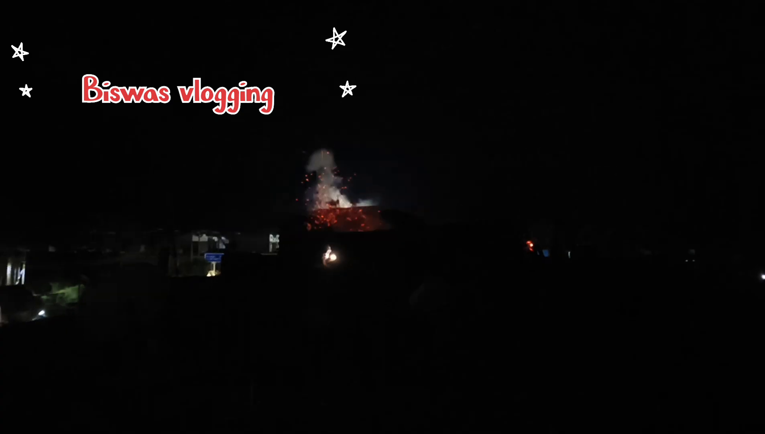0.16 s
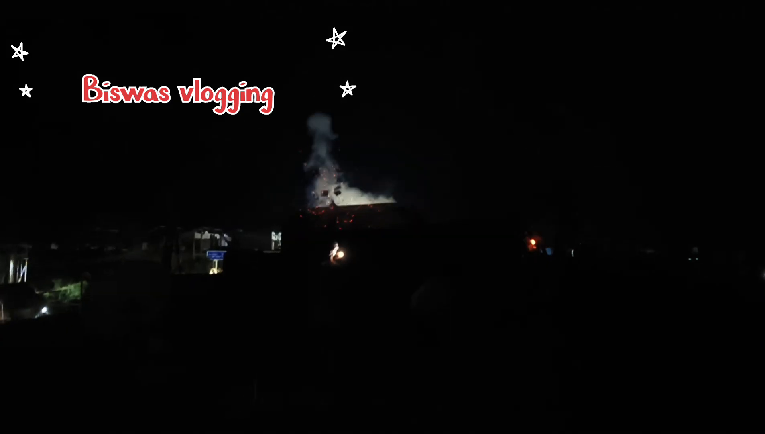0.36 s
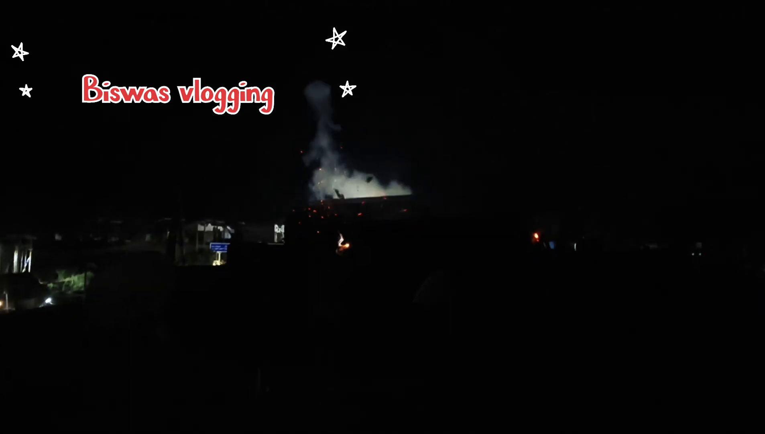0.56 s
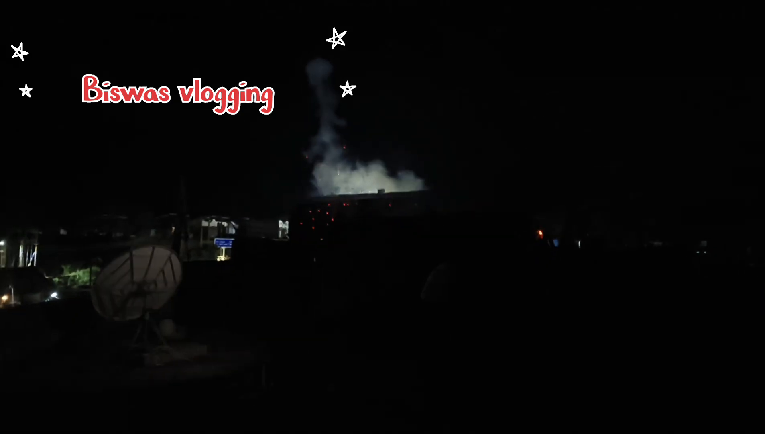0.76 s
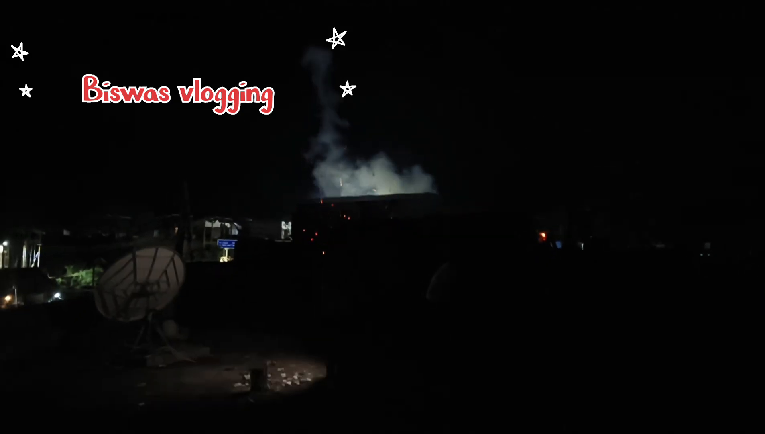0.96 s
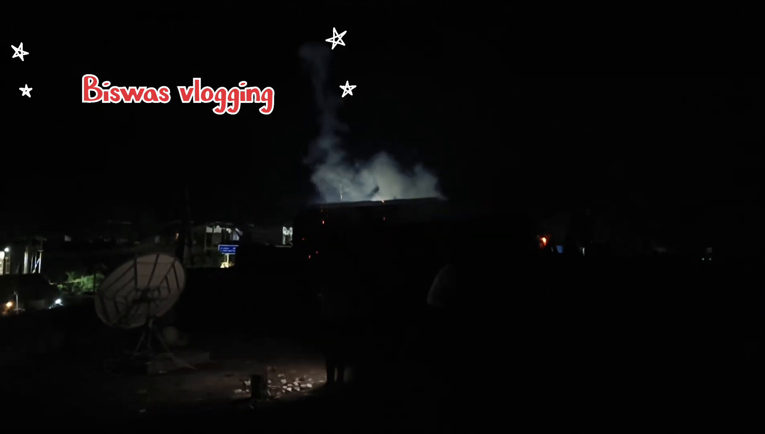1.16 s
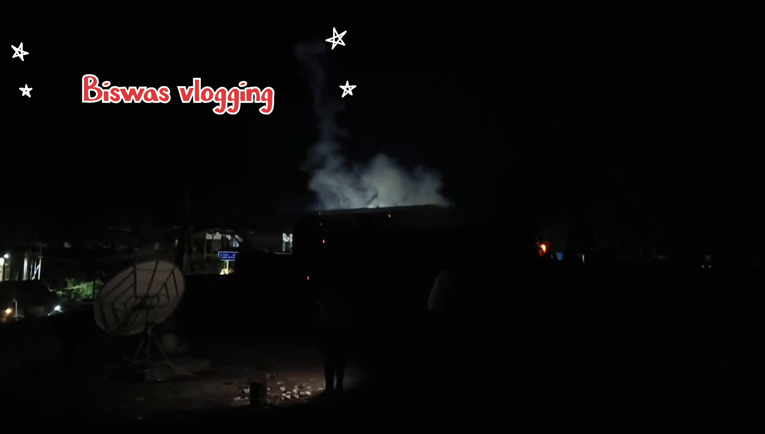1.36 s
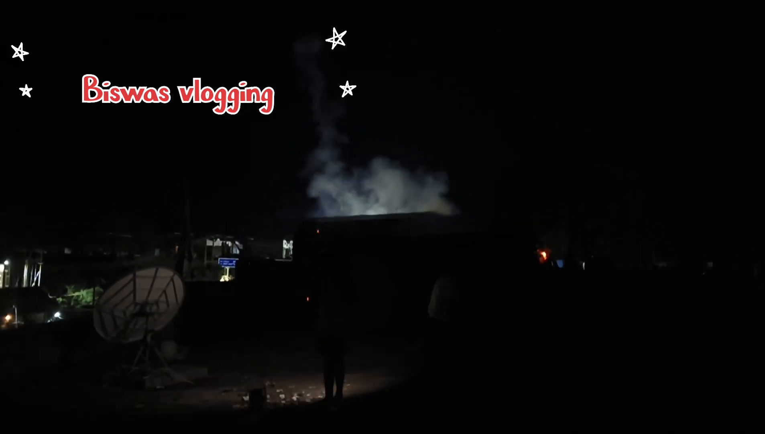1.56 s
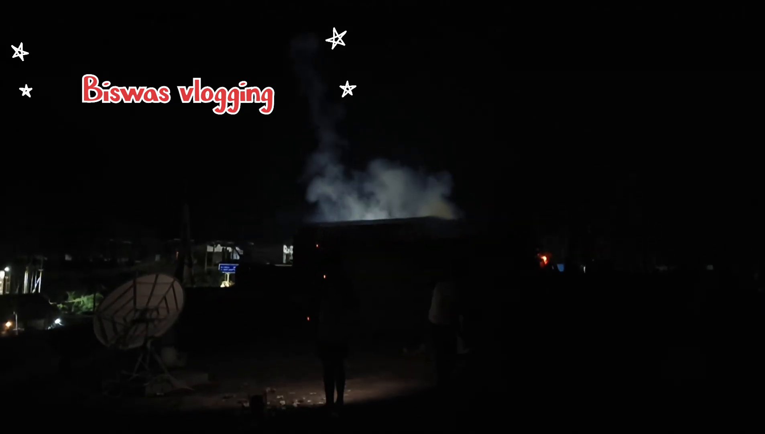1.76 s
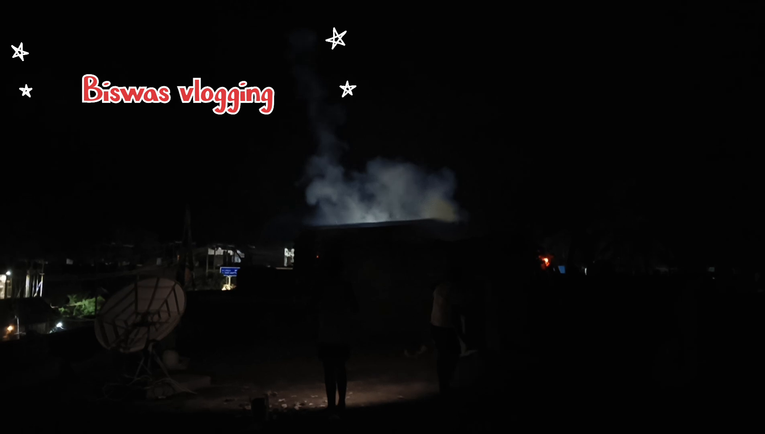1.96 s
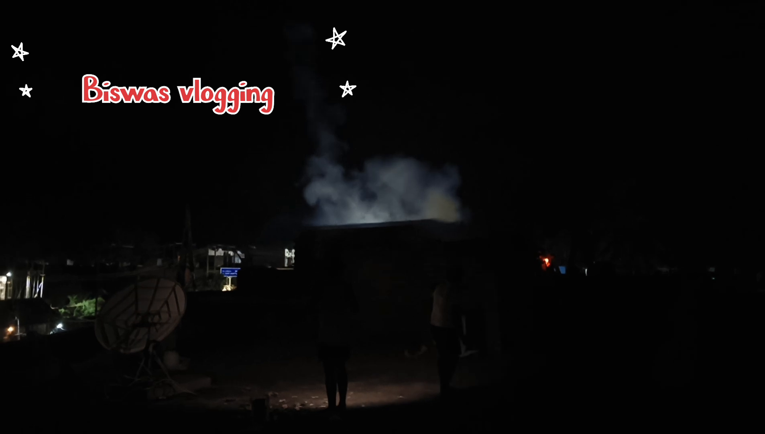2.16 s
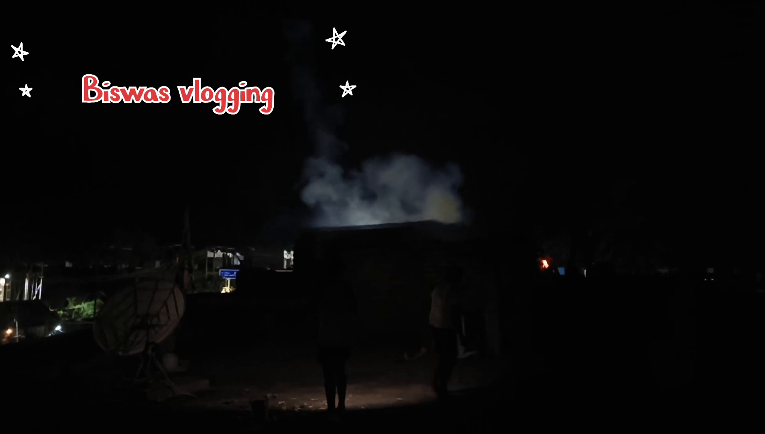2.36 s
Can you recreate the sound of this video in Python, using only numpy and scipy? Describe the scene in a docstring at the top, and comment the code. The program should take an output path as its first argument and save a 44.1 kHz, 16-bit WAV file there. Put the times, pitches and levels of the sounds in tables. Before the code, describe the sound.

One bright firecracker crack and boom, slapping off houses and fading into faint insect trills

```python
"""A firecracker bursts on a rooftop at night with a bright crack of steep-fronted noise.
A boom swells between the near walls, and noise echoes from the houses roll away and grow duller.
Far walls answer with single slaps: one rounded wave each, with a ring and a scatter.
Bands of noise and trilled tones make the insects, over the low noise of a distant town.
The recorder turns its gain down at the bang, recovers slowly and rounds off the peaks."""
import sys
import numpy as np
from scipy import signal
from scipy.fft import rfft, irfft, next_fast_len
from scipy.io import wavfile
from scipy.ndimage import uniform_filter1d, map_coordinates

SR = 44100
rng = np.random.default_rng(int(sys.argv[2]) if len(sys.argv) > 2 else 0)


def pcm_store(signal):
    """Save signal as 16-bit PCM."""
    levels = np.round(np.clip(np.atleast_2d(signal), -1, 1) * 32767)
    wavfile.write(sys.argv[1], SR, levels.astype(np.int16).T)


N = 105840
T = np.arange(N) / SR

# Every SPECTRUM is the relative colour of a noise: f/Hz, level/dB (per Hz)
# Distant town
NIGHT_DB = -56.5
NIGHT_SPECTRUM = [(20, -24), (40, -9.5), (130, -4.5), (208, -3), (674, -10), (1350, -20), (2500, -16.5),
                  (3250, -46), (5500, -120)]

# Far insects
CHORUS_DB = -60
CHORUS_SPECTRUM = [(2000, -10), (2600, 0.5), (4200, -5), (6200, 1.5), (7400, 7), (8600, -9), (9400, -2.5),
                   (12000, -14), (13000, -30)]
# Nearer insect songs: f/Hz, width/Hz, level/dB, left minus right/dB, drift/(dB per s)
INSECT_SONGS = [(7710, 280, -56.5, -1, -0.5), (5230, 170, -68, -5.5, 0.5), (3080, 160, -67.5, -10.5, -1)]

# Bouts of the lower cricket: start t/s, end t/s, level/dB
TRILL_BOUTS = [(1.77, 2.03, -65.5), (2.129, 2.44, -65)]
TRILL_HZ, TRILL_PAN_DB = 5330, -3  # pan is left minus right
HIGH_TRILL_HZ, HIGH_TRILL_PAN_DB, HIGH_TRILL_DB = 8020, 6, -62
STROKES_PER_S, STROKE_FALL_HZ, TRILL_BLUR_HZ = 26.3, 600, 125
CHIRP_S, CHIRP_HZ, CHIRP_DB, CHIRP_WIDTH_S = 2.017, 4250, -59, 0.0065

# Echoes from the houses, before the loss in the air
HOUSE_SPECTRUM = [(25, -35), (60, -11.5), (95, -10), (135, -2), (210, 0), (260, -5), (420, -3.5),
                  (560, -5.5), (700, -9), (1100, -12), (2000, -11), (2900, -15.5), (4500, -18.5),
                  (7900, -28.5), (12000, -28), (15500, -35)]
# Level of those echoes as they roll away: t/s, level/dB
ROLL_LEVEL = [(.22, -5), (.31, -9), (.36, -1), (.43, -2), (.51, 0), (.61, -6), (.70, -9.5), (.78, -14),
              (.91, -16), (1.06, -18.5), (1.17, -22.5), (1.37, -24), (1.49, -27.5), (1.61, -33),
              (1.70, -30.5), (1.88, -36), (2.15, -39.5), (2.4, -40.5)]
# Loss in the air while the echoes travel: f/Hz, loss/(dB per s)
AIR_LOSS = [(60, -2.5), (130, 0), (220, 0), (450, -3), (1000, 0), (2000, 3), (4000, 11.5), (8000, 19),
            (14000, 45.5)]
AIR_START_S = 0.52  # the loss grows from here
NEAR_DB, NEAR_END_S, NEAR_FADE_S = 4, 0.48, 0.045  # early tilt of the echoes, weighted by pitch
GRAIN_DB, GRAIN_PER_S = 1, 800  # single reflections
LUMP_DB, LUMP_PER_S = 0.71, 76  # clusters of reflections

# Walls that answer singly, near to far: t/s, level/dB, half-width/s
WALL_SLAPS = [(0.261, -3, 0.0003), (0.319, 0.5, 0.00046), (0.727, -8, 0.00036), (0.783, -18, 0.00029),
              (0.809, -10, 0.0017), (.829, -16.5, 0.00012), (0.922, -15, 0.00063), (1.028, -11, 0.00039),
              (1.374, -27, 0.00019), (1.69, -32.5, 0.00021), (1.7427, -28, 0.00023),
              (1.7454, -17.5, 0.00047), (1.7799, -21, 0.00038), (2.033, -21.5, 0.00041),
              (2.066, -30.5, 0.00032), (2.139, -36, 0.00022), (2.2989, -29.5, 0.00052)]
# Pitches that ring on after a slap: f/Hz, width/Hz, lift/dB
SLAP_RING = [(332, 120, 1), (1280, 40, 19), (1880, 78, 19)]
# Scatter around each slap
SCATTER_SPECTRUM = [(100, -1), (450, 5), (1300, -2.5), (2800, -14.5), (8000, -67)]
SCATTER_DB, SCATTER_T60_S = -11.5, 0.1

# A house front that returns a broad, hard echo
FRONT_S, FRONT_WIDTH_S, FRONT_DB = 0.45, 0.15, -13.5
FRONT_SPECTRUM = [(500, -22.5), (1300, -9), (2700, 4), (5000, -4), (8000, -28), (15000, -29.5)]

# Boom between the near walls
BOOM_DB, BOOM_SWELL_S, BOOM_HOLD_S, BOOM_FALL_DB_PER_S = -0.5, 0.053, 0.049, 115.5
BOOM_SPECTRUM = [(30, -23), (120, -7), (230, 1), (300, -5), (380, -0.5), (540, -5), (750, -12), (1000, -15),
                 (1500, -19), (3000, -53.5)]
# Resonances of the rooftop: f/Hz, width/Hz, lift/dB
ROOF_RESONANCES = [(66.5, 24, 7), (132, 9.8, 4.5), (169.4, 12, 3), (303.7, 11, 5.5), (380, 12, 1),
                   (534.6, 4.1, 5.5), (734, 11, 3)]

# Short lead-in noise, softening the onset
LEAD_IN_DB, LEAD_IN_S, LEAD_IN_RISE_DB_PER_S = -18.5, 0.037, 602.5
LEAD_IN_SPECTRUM = [(40, -8), (600, 2.5), (1200, -8), (2800, -9.5), (6000, -21), (12000, -22), (15000, -38)]

# The burst
BANG_S, RISE_DB_PER_S = 0.22, 3500  # moment of the burst; steepness of its front
CRACK_DB, CRACK_HOLD_S, CRACK_FALL_DB_PER_S = -1.5, 0.031, 148
CRACK_SPECTRUM = [(60, -10.5), (200, 13), (800, 12.5), (1200, 3), (2200, 8), (4500, -10.5), (8000, -12.5),
                  (13000, -11), (16000, -6.5)]
# Roof edges and parapets that throw the crack back: t/s, level/dB
EDGE_SNAPS = [(0.2226, -2.5), (0.23, -14), (0.244, -14.5), (0.2575, -5.5), (0.324, -10.5)]
SNAP_WIDTH_S = 0.0031
SNAP_SPECTRUM = [(300, -21), (2000, 4.5), (5000, 0.5), (8000, -9.5), (13000, -1), (16000, -7.5)]

# Likeness of the left and right noise: f/Hz, correlation
STEREO_LIKENESS = [(25, .7), (60, 0.96), (130, 0.99), (290, 0.89), (640, 0.65), (1400, -0.21),
                   (15000, 0.07)]
# Stereo balance of the bang: f/Hz, left minus right/dB
BANG_BALANCE = [(60, 0.9), (240, 0.4), (480, 0.5), (950, -1.5), (1890, -5), (3770, -5.5), (7520, -1.5),
                (14000, -0.5)]

# Recorder
THRESHOLD_DB, MAX_CUT_DB, RELEASE_DB_PER_S = -18, 10, 0.22
CEILING = 0.97  # full scale = 1
TOP_HZ, EDGE_HZ = 15760, 60  # upper band limit; softness of its edge


def amp(db):
    """Decibels to gain."""
    return 10 ** (np.asarray(db) / 20)


def unit(x):
    """Scale to rms 1."""
    return x / np.sqrt(np.mean(x ** 2) + 1e-20)


def along(points, hz):
    """Read a curve of (f/Hz, value) points on a log frequency axis."""
    f, value = np.transpose(points)
    return np.interp(np.log(hz + 1), np.log(f + 1), value)


def wobble(rate):
    """A smooth random curve, rate knots a second."""
    return map_coordinates(rng.standard_normal(N // 8), [T * rate], mode="mirror")


def filtered(x, response):
    """Filter x by a response given as a function of frequency."""
    m = next_fast_len(N + SR // 4)
    return irfft(rfft(x, m) * response(np.fft.rfftfreq(m, 1 / SR)), m)[..., :N]


def panned(pan_db):
    """Left and right gains that differ by pan_db."""
    return amp(np.array([[pan_db], [-pan_db]]) / 2)


def ringing(x, resonances):
    """Resonators added to x lift a few pitches, which ring briefly."""
    def response(hz):
        total = 1
        for centre, width, db in resonances:
            band = 1j * hz * width / (centre * centre - hz * hz + 1j * hz * width)
            total = total + (amp(db) - 1) * band
        return total
    return filtered(x, response)


def rush(spectrum, grain=1):
    """Stereo noise of rms 1: alike in the bass, mostly unrelated in the treble."""
    def mid_side(hz):
        # the angle shares the power so that left and right get the wanted correlation
        angle = np.arccos(np.clip(along(STEREO_LIKENESS, hz), -1, 1)) / 2
        return amp(along(spectrum, hz)) * [np.cos(angle), np.sin(angle)]
    mid, side = filtered(grain * rng.standard_normal((2, N)), mid_side)
    return unit(np.array([mid + side, mid - side]))


def reflections(spectrum):
    """Noise of uneven strength stands for a dense train of reflections of the shock."""
    grain_db = GRAIN_DB * wobble(GRAIN_PER_S) + LUMP_DB * wobble(LUMP_PER_S)
    return rush(spectrum, amp(grain_db))


def burst(hold_s, fall_db_per_s):
    """Envelope with a steep front, a hold and a steady fall in dB."""
    age = T - BANG_S
    front_db = RISE_DB_PER_S * np.minimum(age, 0)
    return amp(front_db - fall_db_per_s * np.maximum(age - hold_s, 0))


def night():
    """The distant town is a steady, mostly low noise."""
    return amp(NIGHT_DB) * rush(NIGHT_SPECTRUM)


def insects():
    """Narrow noise bands make the songs, over the broad noise of a far chorus."""
    out = amp(CHORUS_DB) * rush(CHORUS_SPECTRUM)
    for hz, width_hz, db, pan_db, drift_db in INSECT_SONGS:
        band = lambda f: np.exp(-((f - hz) / width_hz) ** 2 / 4)
        song = filtered(rng.standard_normal((2, N)), band)
        out = out + unit(song) * amp(db + drift_db * T) * panned(pan_db)
    return out


def trill(hz, pan_db):
    """Each wing stroke falls in pitch; the surroundings blur the tone."""
    stroke = (STROKES_PER_S * T + rng.random() + 0.059 * wobble(6.3)) % 1  # slightly uneven timing
    phase = 2 * np.pi * np.cumsum(hz + STROKE_FALL_HZ * (0.5 - stroke)) / SR
    knots = 2 * TRILL_BLUR_HZ
    ears = [wobble(knots) * np.sin(phase) + wobble(knots) * np.cos(phase) for ear in range(2)]
    return unit(np.array(ears) * np.sin(np.pi * stroke)) * panned(pan_db)


def crickets():
    """One cricket trills in bouts, a higher one without pause."""
    bouts = np.zeros(N)
    for start, end, db in TRILL_BOUTS:
        inside_s = np.minimum(T - start, end - T)
        bouts += amp(db) * np.clip(inside_s * STROKES_PER_S + 0.5, 0, 1)  # fades last one stroke
    high = amp(HIGH_TRILL_DB) * trill(HIGH_TRILL_HZ, HIGH_TRILL_PAN_DB)
    return bouts * trill(TRILL_HZ, TRILL_PAN_DB) + high


def chirp():
    """One insect calls once: a sine under a short bell-shaped envelope."""
    envelope = np.exp(-((T - CHIRP_S) / CHIRP_WIDTH_S) ** 2)
    return amp(CHIRP_DB) * envelope * np.sin(2 * np.pi * CHIRP_HZ * T)


def slaps():
    """Each wall returns one rounded pressure wave, a brief ring and a short scatter."""
    waves, spread = np.zeros(N), np.zeros(N)
    for s, db, width_s in WALL_SLAPS:
        u = (T - s) / width_s
        waves += amp(db) * u * np.exp((1 - u * u) / 2)  # a dip, then a peak
        onset = (1 + np.tanh(u + 3)) / 2
        spread += amp(db - 60 * np.abs(T - s) / SCATTER_T60_S) * onset
    scatter = amp(SCATTER_DB) * spread * rush(SCATTER_SPECTRUM)
    return ringing(waves, SLAP_RING) + scatter


def house_front():
    """A wide wall sends back the middle treble as one swell."""
    swell = np.exp(-((T - FRONT_S) / FRONT_WIDTH_S) ** 2)
    return amp(FRONT_DB) * swell * burst(0, 0) * reflections(FRONT_SPECTRUM)


def roll():
    """Echoes from ever farther houses; the air takes more treble the longer they travel."""
    hz, t, z = signal.stft(reflections(HOUSE_SPECTRUM), SR, nperseg=512)
    near = 1 / (1 + np.exp(np.clip((t - NEAR_END_S) / NEAR_FADE_S, -50, 50)))
    treble = along([(400, 0.23), (2000, 0.82)], hz)[:, None]
    near_db = NEAR_DB * treble * (near - 0.7)  # near walls return more treble than far ones
    air_db = along(AIR_LOSS, hz)[:, None] * np.maximum(t - AIR_START_S, 0)
    echoes = signal.istft(z * amp(near_db - air_db), SR, nperseg=512)[1][:, :N]
    return echoes * amp(np.interp(T, *np.transpose(ROLL_LEVEL))) * burst(0, 0)


def boom():
    """Low sound builds up between the near walls and drains away."""
    swell = np.clip((T - BANG_S) / BOOM_SWELL_S, 0, 1)
    envelope = swell * burst(BOOM_SWELL_S + BOOM_HOLD_S, BOOM_FALL_DB_PER_S)
    return amp(BOOM_DB) * envelope * rush(BOOM_SPECTRUM)


def lead_in():
    """A short noise rises steeply into the crack."""
    age = T - BANG_S
    gate = np.clip((age + LEAD_IN_S) / 0.01, 0, 1) * np.clip(1 - age / 0.003, 0, 1)
    rise = amp(LEAD_IN_DB + LEAD_IN_RISE_DB_PER_S * np.minimum(age, 0))
    return gate * rise * rush(LEAD_IN_SPECTRUM)


def crack():
    """The shock with its first bright reflections off the roof."""
    envelope = amp(CRACK_DB) * burst(CRACK_HOLD_S, CRACK_FALL_DB_PER_S)
    snaps = sum(amp(db) * np.exp(-((T - s) / SNAP_WIDTH_S) ** 2) for s, db in EDGE_SNAPS)
    return envelope * reflections(CRACK_SPECTRUM) + snaps * rush(SNAP_SPECTRUM)


def scene():
    """The bang and its echoes, stronger on the right in the treble, over the night."""
    bang = lead_in() + crack() + ringing(boom() + roll(), ROOF_RESONANCES) + slaps() + house_front()
    bang = filtered(bang, lambda hz: amp(np.outer([1, -1], along(BANG_BALANCE, hz)) / 2))
    return bang + insects() + crickets() + chirp() + night()


def record(dry):
    """Gain control that cuts fast and recovers slowly, soft clipping, band limit."""
    power = np.abs(uniform_filter1d(np.mean(dry ** 2, axis=0), size=220))  # 5 ms average
    level_db = 10 * np.log10(power + 1e-12)
    need_db = np.clip(level_db - THRESHOLD_DB, 0, MAX_CUT_DB)
    # the running maximum holds each cut, less a steady release
    cut_db = np.maximum.accumulate(need_db + RELEASE_DB_PER_S * T) - RELEASE_DB_PER_S * T
    x = dry * amp(-cut_db)
    x = x / (1 + np.abs(x / CEILING) ** 4) ** (1 / 4)
    return filtered(x, lambda hz: (1 - np.tanh((hz - TOP_HZ) / EDGE_HZ)) / 2)


dry = scene()
out = record(dry)
pcm_store(out)
```